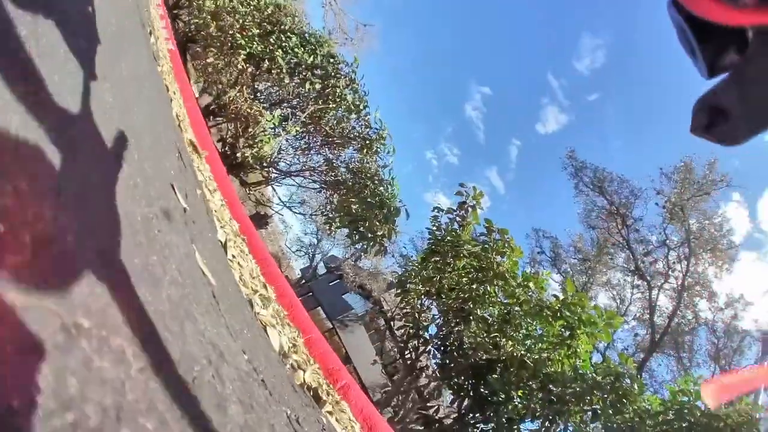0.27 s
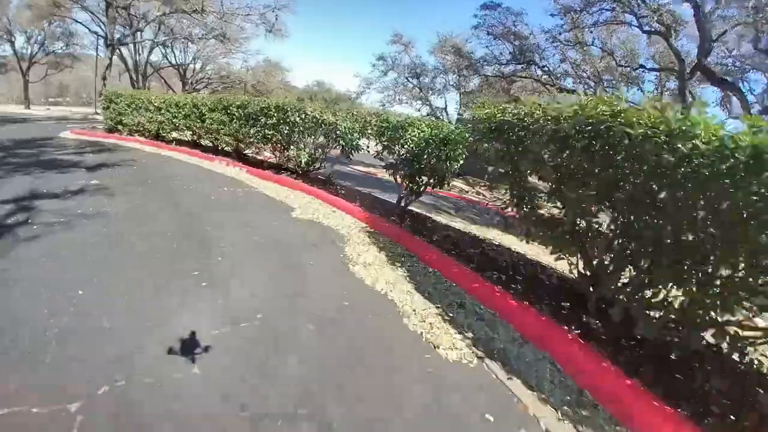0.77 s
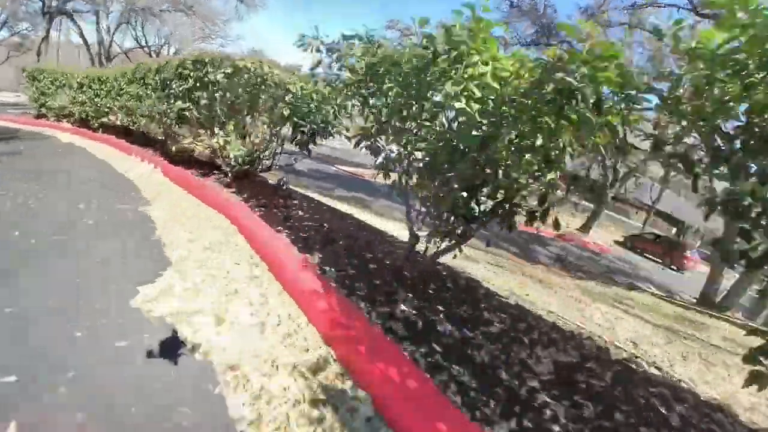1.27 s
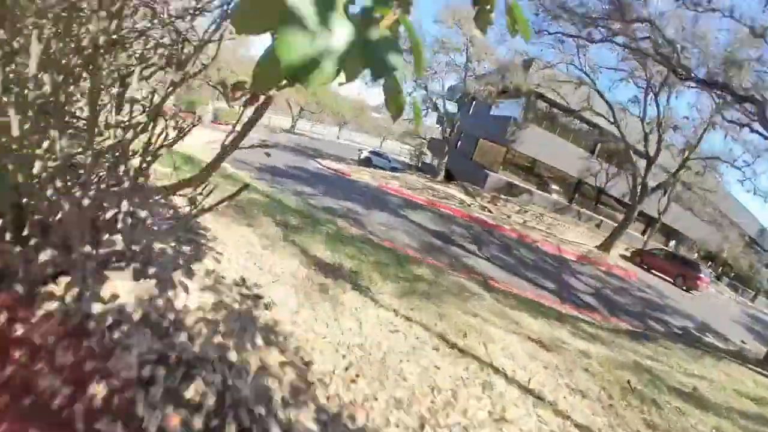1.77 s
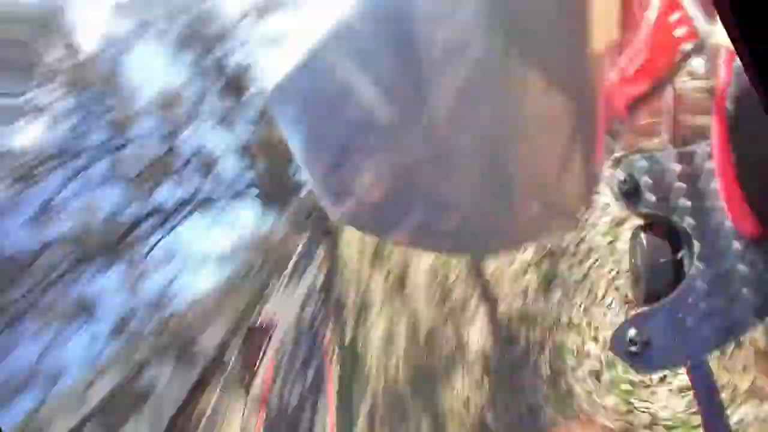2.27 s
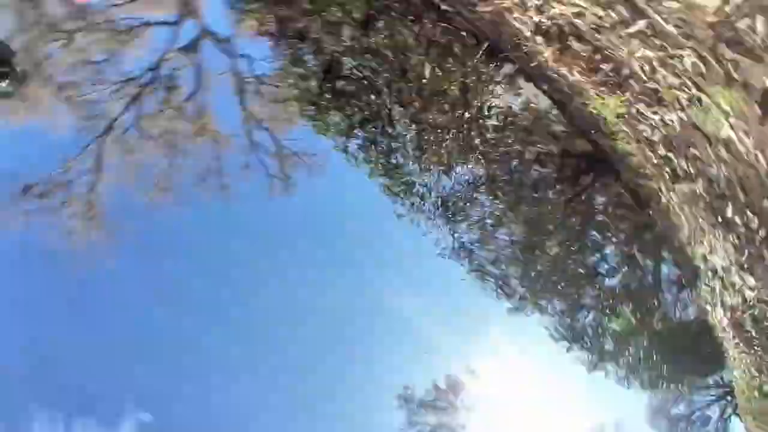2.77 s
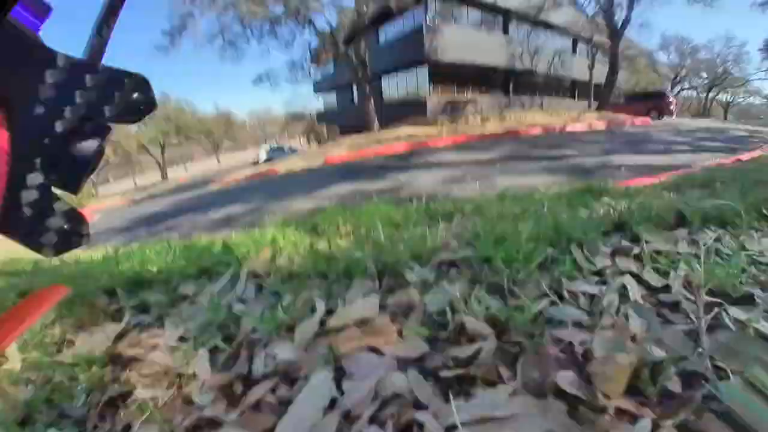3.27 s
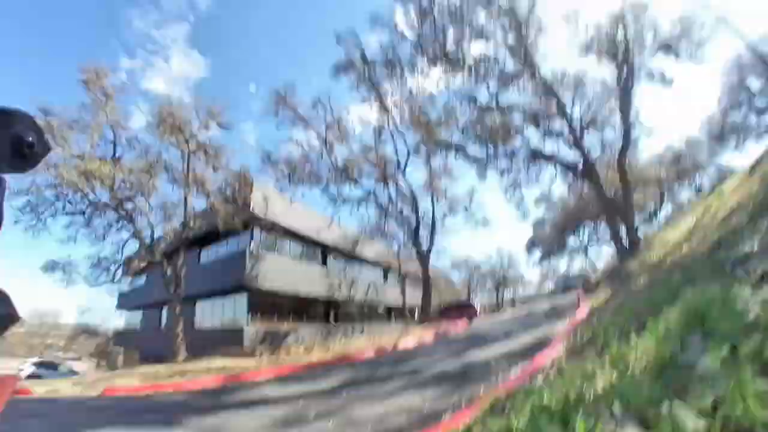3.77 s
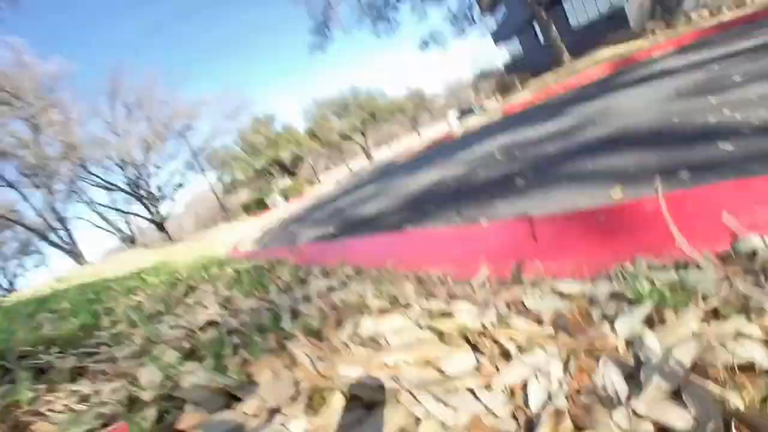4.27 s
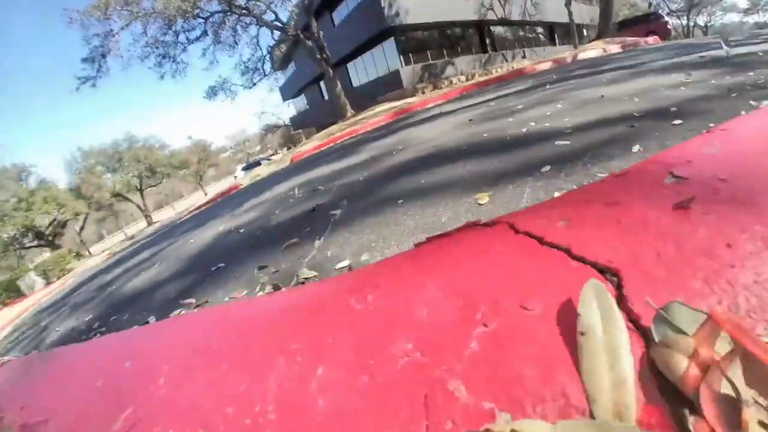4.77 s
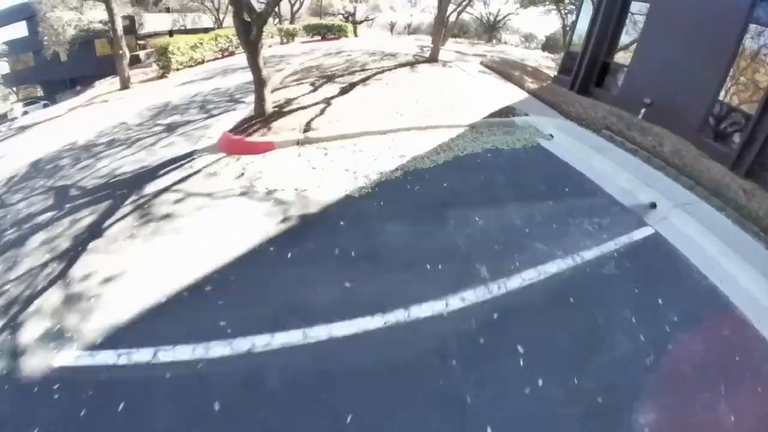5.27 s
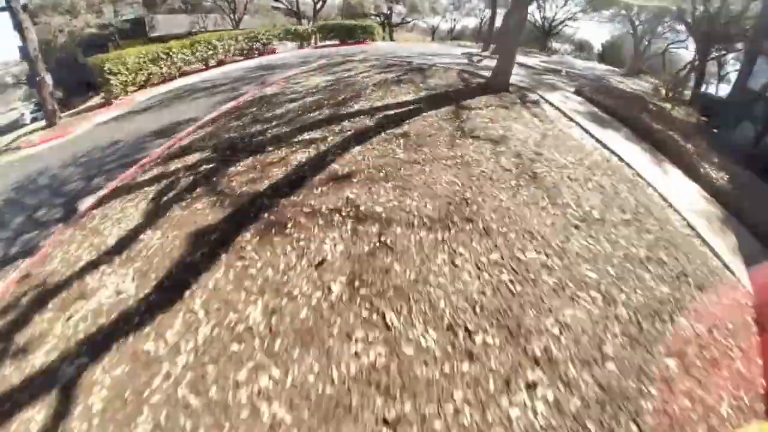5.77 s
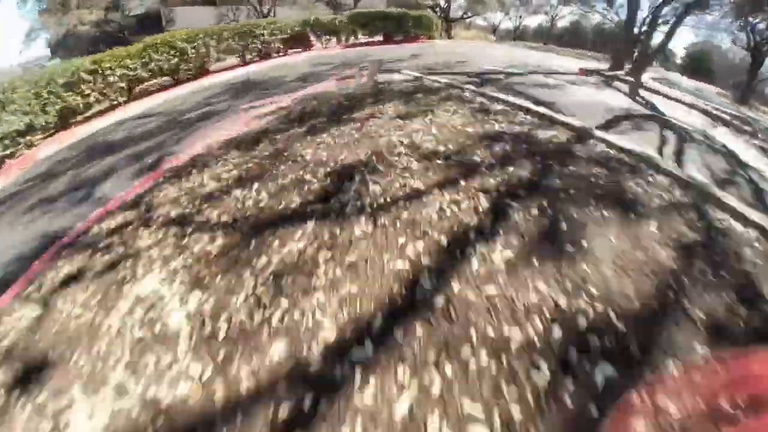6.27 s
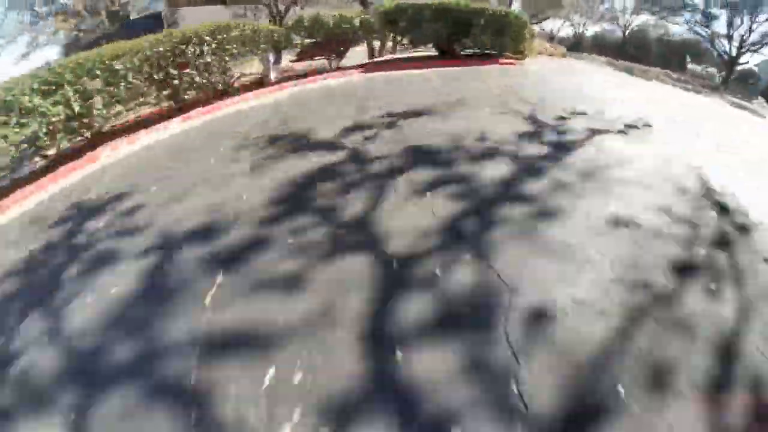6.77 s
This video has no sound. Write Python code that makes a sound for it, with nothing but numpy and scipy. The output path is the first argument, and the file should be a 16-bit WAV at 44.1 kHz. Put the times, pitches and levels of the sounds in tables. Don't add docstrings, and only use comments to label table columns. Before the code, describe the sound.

Heard from inside a small drone's shell outdoors: a faint rotor run-down and leaf ticks, near silence, then an abrupt buzzing flight rising in pitch. A sharp hedge strike, screaming freed rotors, snapping twigs and dry leaf crunches follow. Bursts of rattling and knocks on the ground thin out to faint traffic, then a louder, windier flight cuts in, dips sharply and ends still running.

```python
import sys
import numpy as np
from scipy import signal
from scipy.fft import rfft, irfft, next_fast_len
from scipy.io import wavfile
from scipy.ndimage import uniform_filter1d, map_coordinates

SR = 44100
rng = np.random.default_rng(int(sys.argv[2]) if len(sys.argv) > 2 else 0)


def dump(signal):
    limited = np.clip(np.atleast_2d(signal).T, -1, 1)
    pcm = np.round(limited * 32767).astype(np.int16)
    wavfile.write(sys.argv[1], SR, pcm)


def convert_level_to_amplitude(level_db):
    exponent = np.asarray(level_db, float) / 20
    return 10 ** exponent


N = 310464
TOP_HZ = 15300


def unit(x):
    return x / np.sqrt(np.mean(x ** 2) + 1e-20)


def along(points, hz):
    f, v = np.transpose(points)
    return np.interp(np.log(hz + 1), np.log(f + 1), v)


def gains(tables):
    t, out = np.arange(N) / SR, 0
    for rows in tables:
        s, *columns = np.transpose(rows)
        inside = (t >= s[0]) & (t <= s[-1])
        out = out + np.array([convert_level_to_amplitude(np.interp(t, s, db)) for db in columns]) * inside
    return out


def wobble(rate_hz, size=N):
    knots = rng.standard_normal(int(size * rate_hz / SR) + 4)
    return map_coordinates(knots, [np.arange(size) * rate_hz / SR])


def filtered(x, response):
    m = next_fast_len(N + 8192)
    return irfft(rfft(x, m) * response(np.fft.rfftfreq(m, 1 / SR)), m)[:N]


def rush(spectrum, patchy_db, grain_db):
    grains = rng.standard_normal(N) * convert_level_to_amplitude(grain_db * wobble(900))
    z = signal.stft(grains, nperseg=512)[2]
    field = uniform_filter1d(rng.standard_normal(z.shape), 6, 0)
    field = uniform_filter1d(field, 8, 1)
    x = signal.istft(z * convert_level_to_amplitude(patchy_db * unit(field)), nperseg=512)[1][:N]
    return unit(filtered(x, lambda hz: convert_level_to_amplitude(along(spectrum, hz))))


# (time [s], frequency [Hz], level [dB])
MOAN = [
    [(.21, 471, -81), (.245, 420, -58), (.28, 396, -66), (.36, 435, -78)],
    [(.615, 4680, -92), (.68, 4550, -91), (.771, 4420, -88)],
    [(2.385, 2260, -68), (2.42, 2240, -65), (2.47, 2200, -62)],
]
# (frequency [Hz], density [dB per Hz])
TRAFFIC_SPECTRUM = [(18, -57.5), (30, -46), (168, -21), (328, -10), (800, -3), (1700, -18), (2500, -19),
                    (3600, -26), (14000, -29.5)]
# (time [s], level [dB])
TRAFFIC_LEVEL = [
    [(0.1, -76.5), (0.31, -79.5), (0.76, -79.5)],
    [(2.4, -68), (2.92, -69), (3.0, -80), (3.3, -77), (3.5, -75), (3.8, -75), (4.1, -71)],
    [(4.95, -72), (5.108, -73), (5.27, -74)],
]


def background():
    t, tones = np.arange(N) / SR, 0
    for s, hz, db in map(np.transpose, MOAN):
        phase = 2 * np.pi * np.cumsum(np.interp(t, s, hz)) / SR
        tones = tones + np.sin(phase) * gains([np.c_[s, db]])[0]
    s, db = np.transpose(np.vstack(TRAFFIC_LEVEL))
    traffic = convert_level_to_amplitude(4.0 + np.interp(t, s, db)) * rush(TRAFFIC_SPECTRUM, patchy_db=1, grain_db=1.0)
    return tones * convert_level_to_amplitude(2.5 * wobble(40)) + traffic


# (start [s], end [s], crackle [dB], body [dB], fade [dB per s])
DRAG = [(.09, .28, -80, -76, 150), (-.01, -0.005, -53, -45, 180), (1.952, 2.126, -35, -40, 250),
        (2.2, 2.315, -36.5, -45.5, 1407.5), (2.35, 2.389, -54, -47, 592), (2.472, 2.65, -43.5, -41.5, 105),
        (3.147, 3.394, -66, -87, 107), (3.609, 3.617, -54, -59, 135), (3.885, 3.874, -45, -46, 132.5),
        (3.982, 4.243, -62.5, -75.5, 203), (4.279, 4.79, -45, -60, 352.5), (4.856, 4.85, -67.5, -75, 194)]
# (peak time [s], threefold fall time [s], crackle [dB], body [dB])
CRUNCHES = [ (.08, .0043, -46.5, -55), (1.955, 0.014, -29.5, -36), (2.051, .012, -36, -40.5),
            (2.32, .007, -28, -36), (2.671, 0.005, -26, -38), (2.751, 0.0085, -26.5, -40),
            (2.858, .011, -44, -77), (2.968, .006, -56, -51), (3.123, 0.016, -39, -70),
            (3.137, .0032, -44, -47), (3.167, .0073, -30, -46), (3.192, 0.027, -42, -44),
            (3.392, .0021, -43.5, -66), (3.423, 0.0098, -51, -71), (3.567, 0.02, -41, -42.5),
            (3.855, .024, -43.5, -57), (3.879, 0.017, -25, -45), (3.955, 0.0086, -42, -72),
            (3.635, 0.0053, -46, -64.5), (3.585, .016, -28, -36), (4.173, .02, -33, -44),
            (2.446, .015, -50, -60), (2.14, .008, -36, -36), (2.243, .008, -34, -34),
            (3.248, .004, -40, -50), (3.232, .005, -44, -52), ]
# (peak time [s], threefold fall time [s], crackle [dB], body [dB])
SCRAPES = [ (.018, 0.015, -44, -45), (.262, .027, -72, -65), (1.866, 0.004, -20, -24),
           (1.888, 0.0061, -24.5, -27.5), (2.3, .007, -24, -58.5), (2.548, 0.0088, -24, -47),
           (2.638, 0.0099, -24.5, -48), (3.6, 0.004, -27, -31.5), (3.923, 0.014, -32, -36.5),
           (2.95, 0.027, -82.5, -60), (3.478, 0.011, -64.5, -56.5), (4.186, 0.004, -28, -38.5),
           (4.272, 0.0083, -36, -57), (4.331, 0.012, -29, -44), (4.462, 0.019, -33, -49),
           (4.564, .015, -40.5, -78), ]
# (frequency [Hz], density [dB per Hz])
LEAF_SPECTRUM = [(530, -20.5), (900, -15), (1780, -3), (2920, 2), (3970, -3), (7580, -5), (8630, -4.5),
                 (15000, -12.5)]
# (frequency [Hz], density [dB per Hz])
BODY_SPECTRUM = [(24, -46.5), (40, -29), (259, -3), (585, 4.5), (997, 2.5), (1700, -7.5), (2210, -32),
                 (3740, -120)]
DRAG_RISE_DB_PER_S = 580
CRUNCH_RISE_S, SCRAPE_SWELL = .002, 1.25


def leaves():
    drag, crunch, t = 0, 0, np.arange(0, N + 16, 16) / SR
    for start, end, *db, fade in DRAG:
        before_db = np.maximum(DRAG_RISE_DB_PER_S * (start - t), 0)
        after_db = np.maximum(fade * (t - end), 0)
        drag += convert_level_to_amplitude(np.array(db)[:, None] - before_db - after_db)
    events = [(s, CRUNCH_RISE_S, *rest) for s, *rest in CRUNCHES]
    events += [(s, SCRAPE_SWELL * fall, fall, *db) for s, fall, *db in SCRAPES]
    for s, rise, fall, *db in events:
        shape = np.minimum((t - s) / max(rise, 5e-4), (s - t) / max(fall, 5e-4))
        crunch += convert_level_to_amplitude(np.array(db)[:, None] + 10 * shape)
    drag, crunch = ([np.interp(np.arange(N) / SR, t, g) for g in pair] for pair in (drag, crunch))
    clumps = convert_level_to_amplitude(1.6 * wobble(150))
    crackle = unit(clumps * rush(LEAF_SPECTRUM, patchy_db=1.1, grain_db=3.5))
    body = unit(clumps * rush(BODY_SPECTRUM, patchy_db=1.8, grain_db=3.0))
    light = filtered(drag[1] * body, lambda f: (1j * f / (260 + 1j * f)) ** 2)
    return (drag[0] + crunch[0]) * crackle + crunch[1] * body + light


# (time [s], crack [dB], knock [dB])
STRIKES = [(.0185, -44, -25), (1.8029, -13.5, -18.5), (2.1075, -20, -21.5), (2.768, -45, -31.5),
           (2.836, -51.5, -53.5), (2.9744, -37.5, -49), (3.1433, -56, -31), (3.168, -27, -30),
           (3.3097, -53.5, -52.5), (3.322, -42.5, -48.5), (3.4349, -42.5, -35), (3.5667, -28.5, -36),
           (3.6895, -41, -49), (3.8762, -22, -26), (3.9335, -24, -41.5), (4.1867, -36, -18),
           (4.2188, -23.5, -34), (4.2744, -29, -36), (4.2945, -36, -26.5), (4.6696, -40.5, -32),
           (4.922, -55.5, -77), (6.847, -21.5, -31.5)]
# (time [s], crack [dB])
TICKS = [(.078, -30), (.2576, -47), (.3468, -52), (.3536, -50), (.0495, -40), (.4, -66), (.414, -64),
         (.45, -66), (.477, -62), (1.867, -10.5), (2.0245, -24), (2.2514, -16), (2.546, -11),
         (2.7502, -28.5), (3.022, -37), (3.351, -45), (3.3912, -35), (3.4196, -37.5), (3.5595, -38),
         (3.599, -20), (3.9256, -23), (3.9532, -21), (3.961, -36), (3.891, -26), (3.8572, -38),
         (3.5935, -22), (2.305, -22), (2.7277, -42), (2.3496, -44), (2.378, -46), (4.2637, -32),
         (4.2427, -42), (4.797, -44), (4.586, -40), (4.622, -42), (4.9, -54), (4.865, -54), (4.1408, -42.5),
         (4.5676, -33), (4.8873, -46.5)]
# (time [s], crack [dB], knock [dB])
CHATTER = [(2.6184, -26, -45), (2.6354, -21, -40), (2.6688, -15, -33), (2.6844, -22, -33),
           (2.7028, -19, -33), (2.481, -45, -32), (2.7815, -44, -48), (3.1742, -25, -21),
           (3.1904, -33, -30), (3.2036, -35, -26), (3.2191, -21, -24), (3.2364, -41, -32),
           (3.2485, -37, -33), (3.2654, -52, -36), (3.273, -45, -50), (3.2864, -47, -46),
           (4.3265, -27, -23), (4.3425, -32, -24), (4.356, -32, -24), (4.3709, -29, -27), (4.389, -40, -48),
           (4.3994, -33, -32), (4.476, -32, -28), (4.492, -45, -40), (4.508, -50, -37), (4.707, -44, -32),
           (4.7235, -42, -34), (4.735, -44, -36)]
TICK_KNOCK_DB = -21


def contacts():
    return STRIKES + [(s, db, db + TICK_KNOCK_DB) for s, db in TICKS] + CHATTER


# (frequency [Hz], level [dB])
KNOCK_SPECTRUM = [(40, -27), (200, -3), (600, 3), (1200, 0), (2500, -12), (5000, -30), (12000, -60)]
# (time [s], frequency [Hz], peak level [dB], t60 [s])
RINGS = [
    (2.5455, 2600, -18, .04),
    (2.551, 2400, -20, .03),
    (2.636, 1900, -19, .03),
    (3.8768, 2400, -17, .04),
    (3.599, 5300, -20, .02),
    (4.566, 2500, -28, .02),
    (.079, 3200, -34, .02),
]


def strikes():
    cracks, blows, panel = np.zeros(N), np.zeros(N), np.zeros(N)
    t = np.arange(SR // 50) / SR
    for s, crack_db, knock_db in contacts():
        cracks[round(s * SR):][:len(t)] += convert_level_to_amplitude(crack_db + 5 - 60 * t / 0.0068) * rng.standard_normal(len(t))
        blows[round(s * SR) + 40] += convert_level_to_amplitude(knock_db + 26.5)
    t = np.arange(SR // 10) / SR
    for s, hz, db, t60 in RINGS:
        wander = 1 + .06 * wobble(300, size=len(t))
        ring = np.sin(2 * np.pi * hz * np.cumsum(wander) / SR)
        panel[round(s * SR):][:len(t)] += convert_level_to_amplitude(db - 60 * t / t60) * ring
    sharp = filtered(cracks, lambda f: (1j * f / (1200 + 1j * f)) / (1 + 1j * f / 7000))
    return sharp + filtered(blows, lambda f: convert_level_to_amplitude(along(KNOCK_SPECTRUM, f))) + panel


# (time [s], mean blade rate [Hz], nose trim [Hz], roll trim [Hz], blade tone [dB])
FLIGHT = [
    [(.771, 477, 43, 1.5, -43), (.88, 430.1, 36.13, -2.5, -38), (1.03, 436.7, 31.8, 3, -39),
     (1.12, 538.5, 46, 16.5, -34), (1.2, 601.6, 57.67, 11, -33), (1.4, 632, 52.47, 9.5, -34),
     (1.6, 608.8, 44.3, 27, -35.5), (1.8, 608, 56.55, 19, -36.5), (1.89, 588, 51.05, 28.5, -46.5)],
    [(5.276, 582.4, 24.5, 9.5, -38.5), (5.55, 600.6, 38, 5, -32.5), (5.8, 661.3, 31, 9, -33),
     (6.1, 677, 22, 12.5, -29.5), (6.5, 670, 17.5, 3, -31), (6.79, 581, 20.5, 9.5, -30),
     (6.885, 406, -29, -18.5, -40.5), (6.955, 326, -4, 15, -33.5), (7.04, 364, 34, -35, -27.5)],
]
# (time [s], turbulence [dB])
AIR = [
    [(.771, 0.5), (.85, -10.5), (1.03, -9.5), (1.2, -5.5), (1.5, -2.3), (1.78, -0.5), (1.9, -4.5)],
    [(5.2755, 7.5), (5.36, 4.5), (5.75, 2), (6.2, 4), (6.6, -0.2), (6.85, 2.5), (6.9, -0.5), (7.04, 5)],
]
# (level [dB], slope [dB per octave of rotor speed], turbulence share [0-1], crosswind lift [dB])
AIR_LAYERS = [(-49, -7, .8, -0.1), (-31.5, .1, 0.96, 0.3), (-38.5, 2, 0.11, 10.5), (-38, 5.5, 0.45, -4)]
CRUISE_HZ = 600
CROSSWIND_START_S, CROSSWIND_END_S, TURN_S = 5.0, 5.79, .04


def airflow():
    t, (s, hz, *_) = np.arange(N) / SR, np.vstack(FLIGHT).T
    octaves = np.log2(np.interp(t, s, hz) / CRUISE_HZ)
    cross = np.clip((CROSSWIND_END_S - t) / TURN_S, 0, 1) * (t > CROSSWIND_START_S)
    turbulence = gains(AIR)[0]
    return [convert_level_to_amplitude(db + slope_db * octaves + lift_db * cross) * turbulence ** share
            for db, slope_db, share, lift_db in AIR_LAYERS]


# (frequency [Hz], density [dB per Hz])
BUFFET_SPECTRUM = [(20, -53.5), (50, -16.5), (188, -5), (318, -2.5), (664, -3), (1000, -5), (1800, -20),
                   (3000, -120)]
# (frequency [Hz], density [dB per Hz])
WASH_SPECTRUM = [(290, -37.5), (500, -7.5), (1100, -3), (1230, -2.5), (2810, -5), (4200, -36.5),
                 (5460, -50.5), (9240, -120)]
# (frequency [Hz], density [dB per Hz])
SCOUR_SPECTRUM = [(1650, -11.5), (2800, 2), (3430, -4.5), (4770, -4), (7000, -17), (9100, -16.5),
                  (15400, -120)]
# (frequency [Hz], density [dB per Hz])
HISS_SPECTRUM = [(3820, -5.5), (6500, -5), (14700, -14), (15700, -21), (16000, -35)]


def air():
    buffet, wash, scour, hiss = airflow()
    gust = np.clip(wobble(14), -1, 1) / 2
    lumps = convert_level_to_amplitude(1.8 * np.clip(wobble(18), -2, 1.3))
    low = convert_level_to_amplitude(11.5) * lumps * buffet * rush(BUFFET_SPECTRUM, patchy_db=2.0, grain_db=-6.5)
    mid = wash * rush(WASH_SPECTRUM, patchy_db=1.8, grain_db=2.5)
    mid = mid + scour * rush(SCOUR_SPECTRUM, patchy_db=0.5, grain_db=2.5)
    high = hiss * rush(HISS_SPECTRUM, patchy_db=.8, grain_db=1.0)
    return low + convert_level_to_amplitude(-0.85 + 2.2 * gust) * mid + convert_level_to_amplitude(1.45 + 0.57 * gust) * high


CORNERS = [(1, 1), (1, -1), (-1, 1), (-1, -1)]
NEAR_DB = [(-1.5, -1.9, 2.5, -2.6), (-0.45, 0.5, -2.4)]


def mixer():
    for sticks, near in zip(FLIGHT, NEAR_DB):
        s, mean_hz, nose_hz, roll_hz, db = np.transpose(sticks)
        for (nose, roll), own_db in zip(CORNERS, near):
            yield np.c_[s, mean_hz + nose * nose_hz + roll * roll_hz, db + own_db]


# (start [s], end [s], initial speed deficit [0-1], spin-up time [s], blade tone [dB])
RACING = [
    (1.897, 2.306, 0.48, 0.018, -36),
    (2.464, 2.56, 0.5, .035, -39.5),
    (2.515, 2.668, .62, .035, -44),
]
# (time of slowest [s], speed lost [0-1], braking time [s])
SNAGS = [
    [(2.211, .39, .036), (2.335, .05, 0.035)],
    [(2.53, 0.1, .018), (2.562, 0.6, 0.0076)],
    [(2.659, 0.16, 0.02)],
]
FREE_HZ = 1499
RECOVER_S, WAKE_DB, WAKE_S = .026, 12, 0.028
STRAIN_DB = 11


def racing():
    for (start, end, short, spin_s, db), snags in zip(RACING, SNAGS):
        s, lost = np.arange(start, end, 1 / 500), 0
        for at, depth, brake_s in snags:
            braking = np.clip(1 + (s - at) / brake_s, 0, 1)
            recovery = np.exp(-np.abs(s - at) / RECOVER_S)
            lost = lost + depth * np.where(s < at, braking, recovery)
        lost = uniform_filter1d(lost, size=5)
        hz = FREE_HZ * (1 - short * np.exp((start - s) / spin_s)) * (1 - lost)
        yield np.c_[s, hz, db - WAKE_DB * np.exp((start - s) / WAKE_S) + STRAIN_DB * lost]


# (frequency [Hz], width [Hz], lift [dB])
HOUSING = [
    [(4700, 300, 9), (5600, 300, 11), (6300, 400, 15)],
    [(4180, 500, 12), (5750, 400, 15), (8200, 900, 6)],
]
BLADES, MAGNET_ORDER = 3, 36
BRAKE_DB, BRAKE_FROM_PER_S = 7, 1
COARSE = 32


def rotor(rows, build, jitter, flicker_db, between_db, knee, droop_db, shell=HOUSING[0], dull_db=0):
    s, blade_hz, db = np.transpose(rows)
    i = np.arange(round(s[0] * SR), min(round(s[-1] * SR), N))
    unsteady = wobble(25, size=len(i)) + .6 * wobble(140, size=len(i))
    shaft = np.interp(i / SR, s, blade_hz) / BLADES * (1 + jitter * unsteady)
    turn, tone = 2 * np.pi * np.cumsum(shaft) / SR, np.zeros(len(i))
    *unbalance_db, fall_db, whine_db = build
    knots = i[::COARSE]
    coarse = shaft[::COARSE]
    slowed = 1 - coarse / shaft.max()
    slowing = -np.gradient(np.log(np.interp(knots / SR, s, blade_hz)), COARSE / SR)
    braking = np.maximum(uniform_filter1d(slowing, 30) - BRAKE_FROM_PER_S, 0)
    steady_db = np.median(db) - np.interp(knots / SR, s, db) - BRAKE_DB * braking
    for k in range(1, MAGNET_ORDER + 1):
        if k % BLADES and k > 5 * BLADES:
            continue
        if k < BLADES:
            level = unbalance_db[k - 1] - 16 * droop_db * slowed
        elif k == MAGNET_ORDER:
            level = whine_db + steady_db
        else:
            level = -fall_db * np.log2(max(k / (BLADES * knee), 1)) - droop_db * k * slowed
            level = level + (between_db if k % BLADES else 0)
            level = level - dull_db * np.log2(max(k / 12, 1))
        coupling = {24: .9, MAGNET_ORDER: 1}.get(k, .1)
        lift = coupling * sum(g / (1 + (2 * (k * coarse - c) / w) ** 2) for c, w, g in shell)
        flicker = flicker_db * (1 + k / 30) * wobble(70 * COARSE, size=len(coarse))
        size = convert_level_to_amplitude(level + lift + flicker) * (k * coarse < TOP_HZ)
        tone += np.interp(i, knots, size) * np.sin(k * turn + rng.uniform(0, 2 * np.pi))
    out = np.zeros(N)
    out[i] = 2 ** .5 * convert_level_to_amplitude(np.interp(i / SR, s, db)) * tone * signal.windows.tukey(len(i), 200 / len(i))
    return out


# (shaft order 1 [dB], order 2 [dB], overtone fall [dB per octave], magnet whine [dB])
BUILD = [(-22.5, -21.5, 7.5, -24), (-21, -22.5, 8, -32), (-23, -27.5, 31, -40), (-6, -4, 25.5, -35),
         (-8.5, -2.5, 8, -22), (-16.5, -16.5, 14, -24), (-27, -35, 12, -21)]
# (shaft order 1 [dB], order 2 [dB], overtone fall [dB per octave], magnet whine [dB])
RACING_BUILD = [(-10, -22, 8.5, -30), (-12, -10, 12, -50), (1, 3, 11, -50)]
# (time [s], blade rate [Hz], blade tone [dB])
COASTING = [
    [(2.306, 1200, -40), (2.32, 1050, -43), (2.335, 780, -52)],
    [(2.706, 1330, -50), (2.72, 1300, -52), (2.75, 850, -60)],
    [(.085, 1520, -59), (.11, 1480, -63), (.16, 1020, -69), (.22, 650, -82)],
]


def rotors():
    out = np.zeros(N)
    for rows, build in zip(mixer(), BUILD):
        shell = HOUSING[int(rows[0, 0] > 5)]
        out += rotor(rows, build, jitter=.004, flicker_db=1.8, between_db=-16, knee=1.15, droop_db=.05,
                     shell=shell, dull_db=9)
    for rows, build in zip(racing(), RACING_BUILD):
        out += rotor(rows, build, jitter=.007, flicker_db=3.3, between_db=-20, knee=2.9, droop_db=1.2)
    for rows in COASTING:
        out += rotor(rows, (-20, -20, 36, -60), jitter=.01, flicker_db=3, between_db=-24, knee=1, droop_db=1)
    return out


def band_edge(hz):
    return np.clip((TOP_HZ + 150 - hz) / 300, 0, 1)


def strike_edge(hz):
    return np.maximum(band_edge(hz), convert_level_to_amplitude(-28) * np.clip((16500 - hz) / 400, 0, 1))


def scene():
    mono = filtered(background() + leaves() + air() + rotors(), band_edge)
    mono = mono + filtered(strikes(), strike_edge)
    treble = filtered(mono, lambda hz: np.clip(hz / 1000 - 4.5, 0, 1))
    sway = convert_level_to_amplitude(-26) * wobble(40) * treble
    return np.array([mono + sway, mono - sway])


def top_cut(x):
    return signal.sosfilt(signal.butter(12, 16530, fs=SR, output="sos"), x)


def record(dry):
    held = dry / (1 + np.abs(dry / .31) ** 4) ** .25
    return top_cut(held)


dry = scene()
out = record(dry)
dump(out)
```